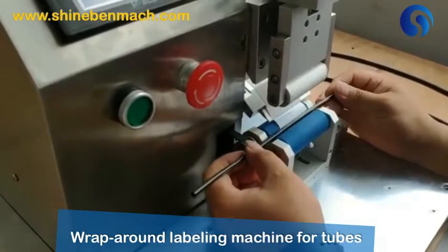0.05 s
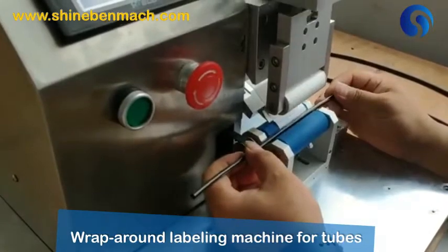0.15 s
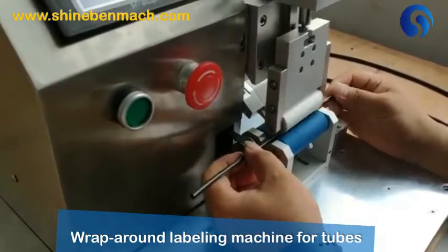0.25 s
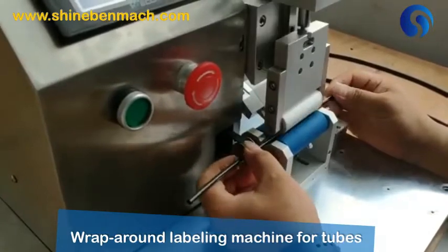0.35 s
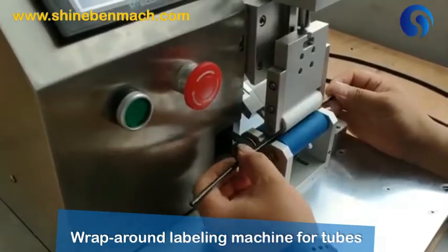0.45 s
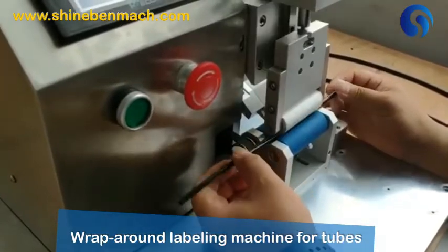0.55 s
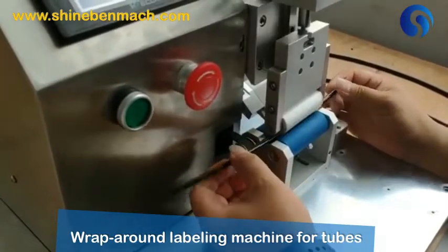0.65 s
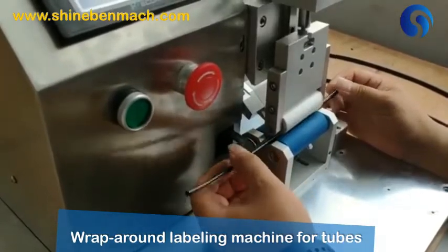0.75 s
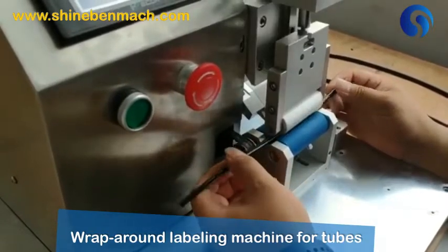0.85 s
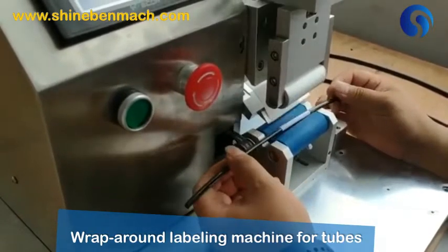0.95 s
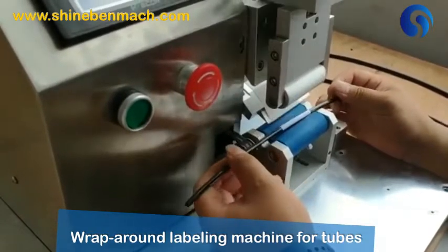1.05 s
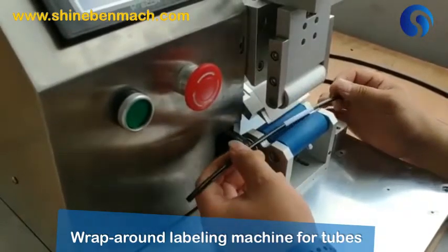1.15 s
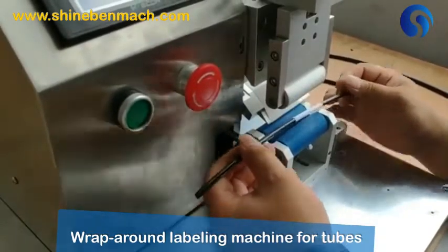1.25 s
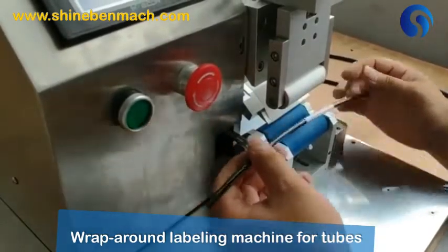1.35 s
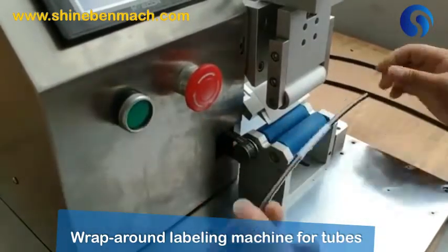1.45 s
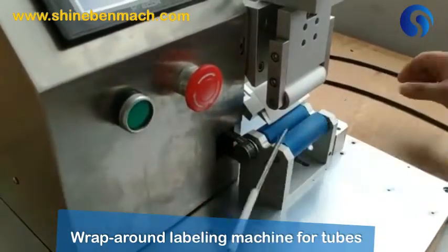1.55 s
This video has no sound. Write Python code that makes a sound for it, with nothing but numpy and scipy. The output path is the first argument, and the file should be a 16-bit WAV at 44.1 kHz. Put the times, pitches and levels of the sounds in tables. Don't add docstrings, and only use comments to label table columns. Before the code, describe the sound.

A pneumatic labelling machine head clatters down onto its stops, presses, then knocks back up with sharp puffs of air, over steady distant hiss in an echoing workshop, heard close through a narrow, clipping phone microphone.

```python
import sys
import numpy as np
from scipy import signal
from scipy.fft import rfft, irfft
from scipy.io import wavfile

SR = 44100
rng = np.random.default_rng(int(sys.argv[2]) if len(sys.argv) > 2 else 0)


def log_audio(samples):
    frames = np.atleast_2d(samples).T
    limited = np.clip(frames, -1, 1)
    pcm = np.round(limited * 32767).astype(np.int16)
    wavfile.write(sys.argv[1], SR, pcm)


def nominal_scale(level):
    x = np.asarray(level, float) / 20
    return 10 ** x


N = 72765

# freq_hz [Hz], density_db [dB per Hz]
HISS_SPECTRUM = [(100, -0.5), (170, -6), (264, -1.5), (788, -1), (1070, -0.5), (2670, -4), (4500, -15),
                 (5600, -46.5), (7290, -21.5), (9480, -53), (16000, -120)]
# time_s [s], level_db [dB]
HISS_LEVEL = [(0, -30), (.2, -29), (0.799, -32), (1.304, -34), (1.65, -33.5)]
HISS_PATCHY_DB = 1.5

# freq_hz [Hz], t60_s [s]
HALL_DECAY = [(200, 0.85), (1000, 1.42), (4000, 1.26), (7400, 0.77)]
HALL_DB, HALL_DELAY_S, HALL_BUILD_S = -12.5, 0.024, 0.0072

# pitch_hz [Hz], width_hz [Hz], level_db [dB]
PIPE_TONES = [(2760, 360, -25), (3260, 70, 2.5), (3983, 40, -1), (4386, 230, 4.5), (1230, 160, 3),
              (7550, 67, 12.5), (5420, 550, 3)]
# start_s [s], rise_s [s], hold_s [s], centre_hz [Hz]
VENTS = [
    (.215, .03, .1, 2900),
    (.375, .01, .07, 3800),
    (.908, .014, .01, 6000),
    (.945, .02, .065, 2400),
    (1.065, .025, .015, 2500),
    (.608, .008, .018, 5000),
    (1.018, .01, .008, 4500),
    (1.09, .03, .1, 1300),
    (.198, .015, .01, 3500),
    (1.2, .03, .05, 1400),
]
VENT_LEVELS = [-17, -27, -16.5, -20, -27, -23.5, -28, -30.5, -22.5, -29.5]
# start_s [s], rise_s [s], hold_s [s], centre_hz [Hz]
LEAKS = [(.214, .008, .01, 5200), (.53, .012, .004, 4900), (.57, .015, .015, 7200),
         (.906, .004, .006, 5500), (1.02, .008, .005, 6900), (.2, .004, .015, 2850),
         (.985, .015, .025, 4200), (.24, .005, .02, 4100), (.05, .02, .06, 7200), (.825, .015, .03, 4200),
         (.922, .003, .006, 4300), (.94, .006, .04, 4300), (1.035, .005, .012, 1100), (1.1, .01, .04, 850),
         (1.22, .02, .09, 950), (.385, .01, .02, 4400)]
LEAK_LEVELS = [-25, -28, -37, -24, -19, -27, -22, -20, -43, -35, -24, -23, -30, -34, -36, -28]
VENT_WIDTH_OCTAVES, LEAK_WIDTH_OCTAVES = 1, .09
VENT_FALL_S, VENT_FLUTTER_DB = .01, 1.2

# start_s [s], level_db [dB], centre_hz of struck modes [Hz], chatter_s [s]
KNOCKS = [(.2305, -2, 1050, .002), (.2365, -6, 3300, .012), (.3445, -5, 2500, .003),
          (.3475, -1.5, 1500, .003), (.3527, -1, 1600, .002), (.6170, -5, 2300, .002),
          (.572, -12, 2800, .001), (.9345, .5, 1300, .003), (.9385, -.5, 1400, .005),
          (1.0305, 1, 2900, .003), (.2035, -11, 1000, .008), (.207, -17, 320, .015), (.241, -9, 1100, .005),
          (.335, -8, 2700, .008), (.342, -7, 3000, .006), (.360, -19, 550, .015), (.618, -10, 1200, .006),
          (.9225, -13, 4800, .003), (.9255, -8, 4100, .004), (.927, -13, 510, .012), (.943, -9, 2900, .016),
          (1.003, -11, 3900, .003), (1.033, -11, 1050, .012), (1.039, -11, 1800, .003),
          (1.064, -18, 300, .015), (.9365, -8, 1150, .008), (.6175, -10, 4300, .008),
          (.221, -12, 2200, .008), (.2085, -13, 550, .004), (.2145, -11, 1100, .004),
          (.2405, -4, 3300, .005), (.2475, -4, 3300, .005), (.2525, -9, 4100, .008),
          (.2625, -9, 3300, .005), (.277, -10, 3200, .004), (.3565, -7, 1250, .002), (.359, -8, 1200, .002),
          (.362, -10, 1200, .002), (.364, -13, 420, .006), (.372, -13, 800, .004), (.386, -15, 390, .008),
          (.938, -6, 4200, .006), (.947, -6, 3300, .008), (.952, -8, 1700, .008), (1.0385, -9, 1100, .008),
          (1.088, -12, 1700, .005), (.6215, -11, 1200, .004), (.633, -15, 1100, .003)]
# pitch_hz [Hz], level_db [dB], t60_s [s]
BODY_MODES = [(286.5, 1, 0.075), (357.4, -5, 0.074), (522.5, -3.5, 0.085), (650, -10, 0.014),
              (889, -7.5, 0.069), (1096.4, -8, 0.059), (1290, -9, 0.03), (1637, 5.5, 0.0069),
              (2320, 4.5, 0.0063), (2788, -5.5, 0.026), (3402, 1.5, 0.015), (4094, -7.5, 0.0084),
              (4143, -8.5, 0.045), (4910, 2.5, 0.011)]
REACH_OCTAVES, STRIKE_SPREAD_DB, LONGEST_RING_S = .38, 1.5, .04
CHATTER_PER_S, CHATTER_DB = 2500, -5
CRACK_CYCLES, CRACK_DB = 2.5, -5

# start_s [s], depth_db [dB], recovery_s [s]
GAIN_DIPS = [
    (.376, -2, .02),
    (1.046, -3, .02),
]
MIC_LOW_HZ, BAND_EDGE_HZ, TOP_HZ = 186.3, 7445, 16000
MIC_SKEW, OVERLOAD_DB, CEILING = .025, 1.5, .99


def rms_one(x):
    return x / np.sqrt(np.mean(x ** 2) + 1e-20)


def at_hz(points, hz):
    table_hz, values = np.array(points).T
    return np.interp(np.log(hz), np.log(table_hz), values)


def drift(rate_hz):
    r = np.exp(-80 * np.pi * rate_hz / SR)
    slow = signal.lfilter([1], [1, -2 * r, r * r], rng.standard_normal(N // 40 + 2002))
    slow = slow[2000:]
    return np.interp(np.arange(N) / 40, np.arange(len(slow)), rms_one(slow))


def ring(x, hz, t60_s):
    r = nominal_scale(-60 / (max(t60_s, .0005) * SR))
    w = 2 * np.pi * hz / SR
    return signal.lfilter([0, np.sin(w)], [1, -2 * r * np.cos(w), r * r], x + 1e-18)


def bands():
    edges = 80 * 2 ** np.arange(0, 6.9, 1 / 3)
    white = rng.standard_normal((2, N))
    result = []
    for k, (low, high) in enumerate(zip(edges, edges[1:])):
        sos = signal.butter(2, [low, high], "band", fs=SR, output="sos")
        result.append((np.sqrt(low * high), signal.sosfilt(sos, white[k % 2])))
    return result


def hiss():
    shared = drift(0.67)
    noise = 0
    for hz, band in bands():
        patchy_db = HISS_PATCHY_DB * (.5 * shared + drift(12.4))
        noise = noise + nominal_scale(at_hz(HISS_SPECTRUM, hz) + patchy_db) * band
    level_db = np.interp(np.arange(N) / SR, *np.transpose(HISS_LEVEL))
    return nominal_scale(level_db) * rms_one(noise)


def hall(x):
    t = np.maximum(np.arange(N) / SR - HALL_DELAY_S, 0)
    tail = sum(band * nominal_scale(-60 * t / at_hz(HALL_DECAY, hz)) for hz, band in bands())
    tail = tail * (1 - np.exp(-t / HALL_BUILD_S))
    return nominal_scale(HALL_DB) * signal.fftconvolve(x, tail / np.sqrt(np.sum(tail ** 2)))[:N]


def vents(rows, levels_db, width_octaves):
    t = np.arange(N) / SR
    hz = np.fft.rfftfreq(N, 1 / SR) + 1
    white = rng.standard_normal(N)
    air = white
    for pipe_hz, width_hz, db in PIPE_TONES:
        air = air + nominal_scale(db - 15) * rms_one(ring(white, pipe_hz, 0.77 / width_hz))
    jet = rfft(air)
    flutter = nominal_scale(VENT_FLUTTER_DB * drift(82))
    out = 0
    for (start, rise, hold, centre_hz), db in zip(rows, levels_db):
        colour = np.exp(-.5 * (np.log2(hz / centre_hz) / width_octaves) ** 2)
        opening = np.clip((t - start) / rise, 0, 1)
        closing = np.exp(-np.maximum(t - start - rise - hold, 0) / VENT_FALL_S)
        out = out + nominal_scale(db) * opening * closing * rms_one(irfft(jet * colour, N))
    return out * flutter


def contact_clicks(chatter_s, span):
    t = np.arange(span) / SR
    chance, strength = rng.random((2, span))
    bounces = (chance < CHATTER_PER_S / SR) * (2 * strength - 1)
    clicks = bounces * nominal_scale(CHATTER_DB) * np.exp(-t / max(chatter_s, 1e-4))
    clicks[0] = -1
    return clicks


def knocks():
    span = SR // 6
    out = np.zeros(N + SR)
    for start, db, centre_hz, chatter_s in KNOCKS:
        clicks = contact_clicks(chatter_s, span)
        body = 0
        for (mode_hz, mode_db, t60_s), z in zip(BODY_MODES, rng.standard_normal(len(BODY_MODES))):
            strike = np.sign(z) * nominal_scale(mode_db + STRIKE_SPREAD_DB * abs(z))
            nearness = np.exp(-.5 * (np.log2(mode_hz / centre_hz) / REACH_OCTAVES) ** 2)
            body = body + strike * nearness * ring(clicks, mode_hz, min(t60_s, LONGEST_RING_S))
        crack = ring(clicks, centre_hz, CRACK_CYCLES / centre_hz)
        sound = body / np.max(np.abs(body)) + nominal_scale(CRACK_DB) * crack
        first = int(start * SR)
        out[first:first + span] += nominal_scale(db) * sound / np.max(np.abs(sound))
    return out[:N]


def scene():
    air = vents(VENTS, VENT_LEVELS, VENT_WIDTH_OCTAVES) + vents(LEAKS, LEAK_LEVELS, LEAK_WIDTH_OCTAVES)
    machine = knocks() + air
    return (machine + hall(machine) + hiss())[None]


def top_cut(x):
    return signal.sosfilt(signal.butter(12, 7440, fs=SR, output="sos"), x)


def record(dry):
    t = np.arange(N) / SR
    dip_db = 0
    for start, depth_db, recovery_s in GAIN_DIPS:
        onset = np.clip((t - start) / 0.0019, 0, 1)
        dip_db = dip_db + depth_db * onset * np.exp(-(np.maximum(t - start, 0) / recovery_s) ** 2)
    bass_cut = signal.butter(7, MIC_LOW_HZ, "high", fs=SR, output="sos")
    x = nominal_scale(dip_db) * signal.sosfilt(bass_cut, dry)
    x = x + MIC_SKEW * x * x
    narrow = signal.ellip(14, .3, 70, BAND_EDGE_HZ, fs=SR, output="sos")
    x = nominal_scale(OVERLOAD_DB) * signal.sosfilt(narrow, x)
    clipped = np.clip(x, -CEILING, CEILING)
    mix = signal.sosfilt(signal.cheby2(12, 60, TOP_HZ, fs=SR, output="sos"), clipped)
    return top_cut(mix)


dry = scene()
out = record(dry)
log_audio(out)
```